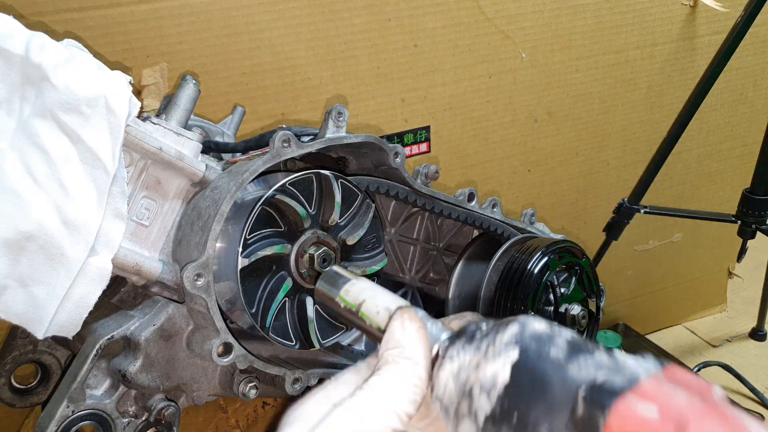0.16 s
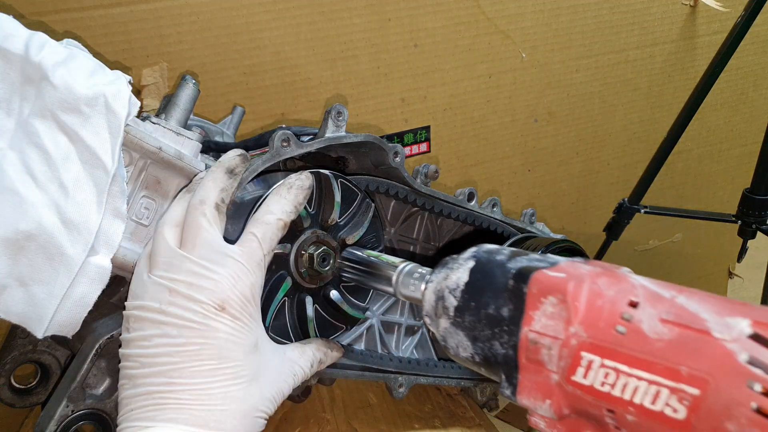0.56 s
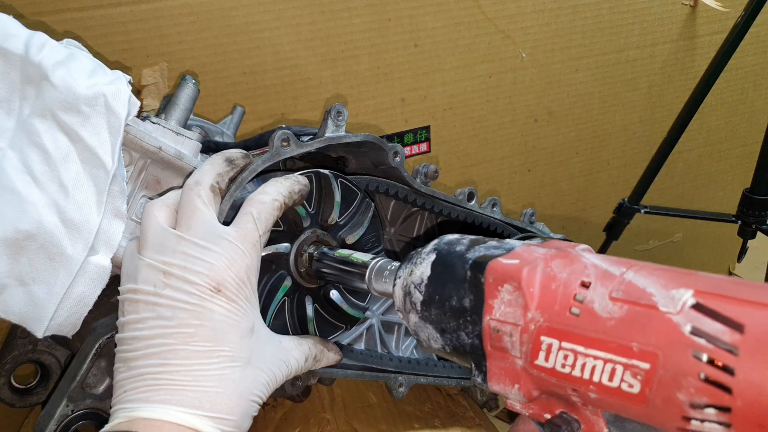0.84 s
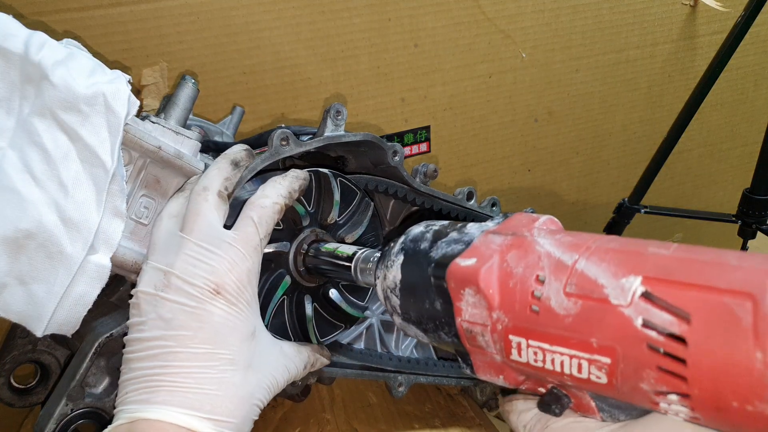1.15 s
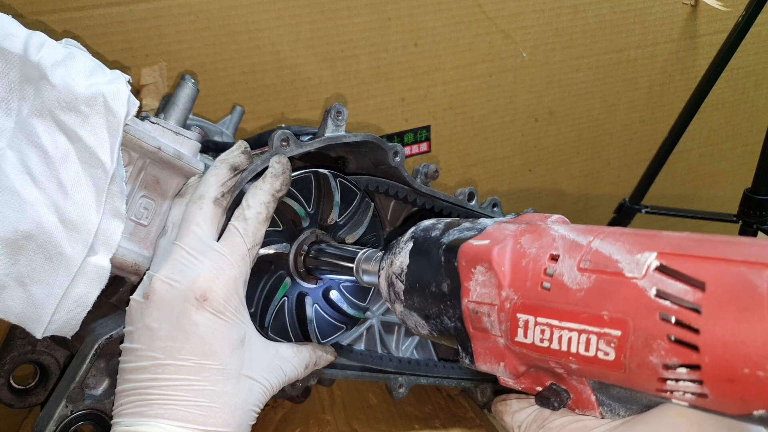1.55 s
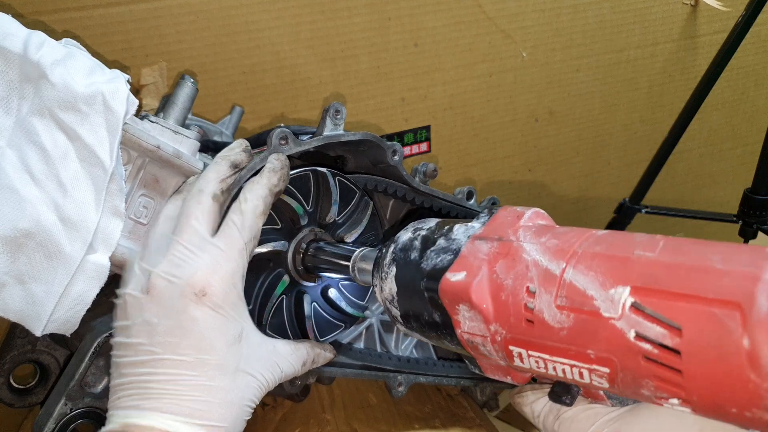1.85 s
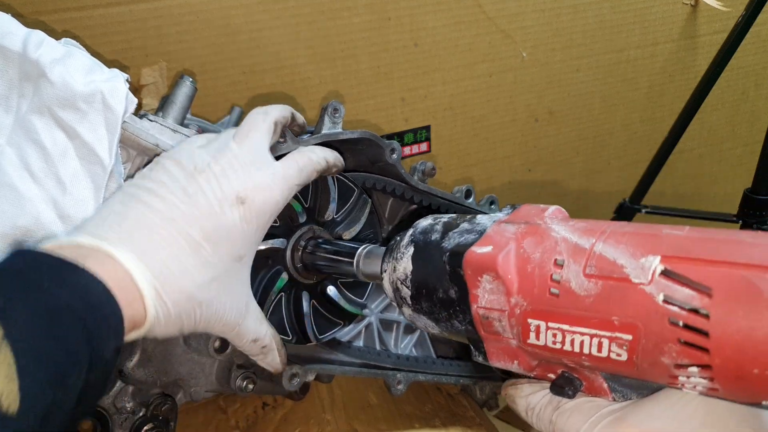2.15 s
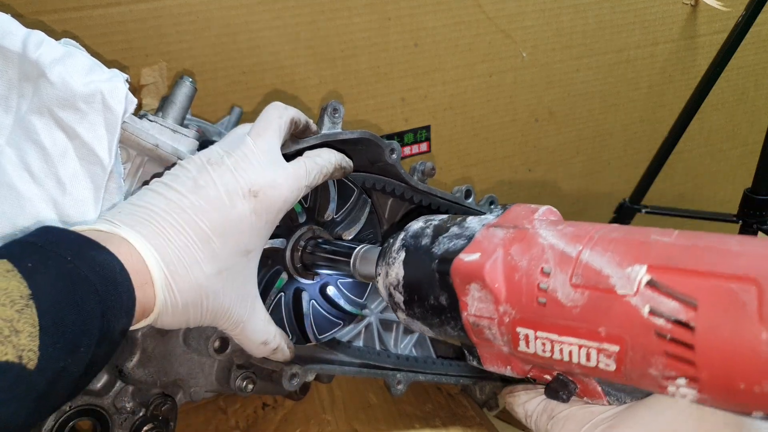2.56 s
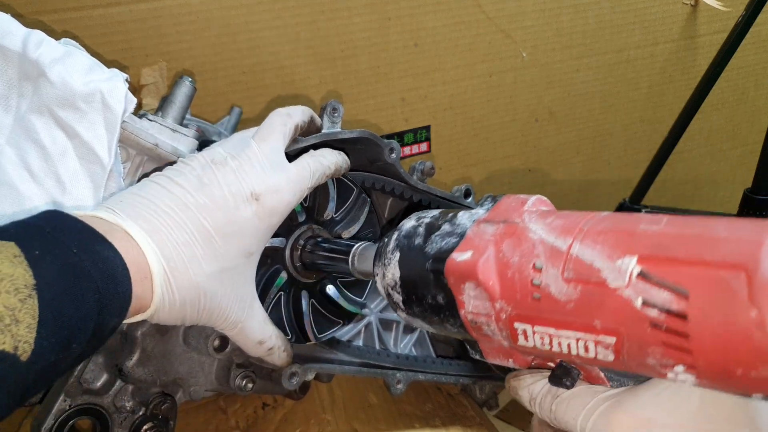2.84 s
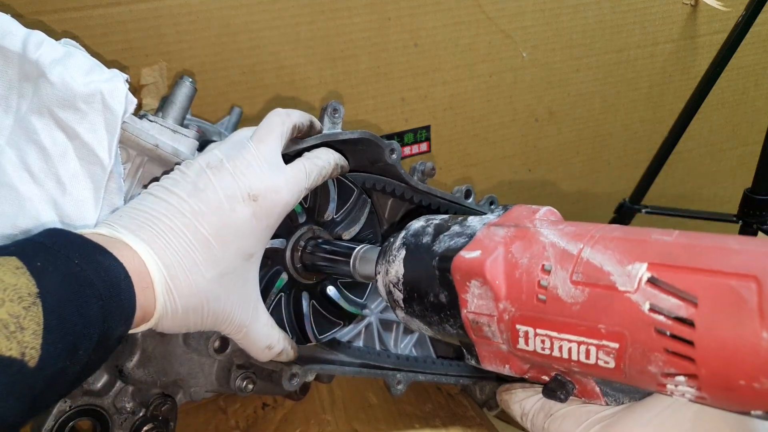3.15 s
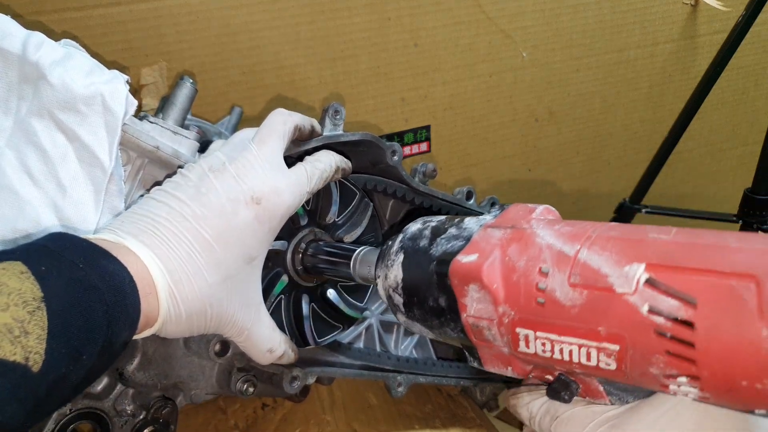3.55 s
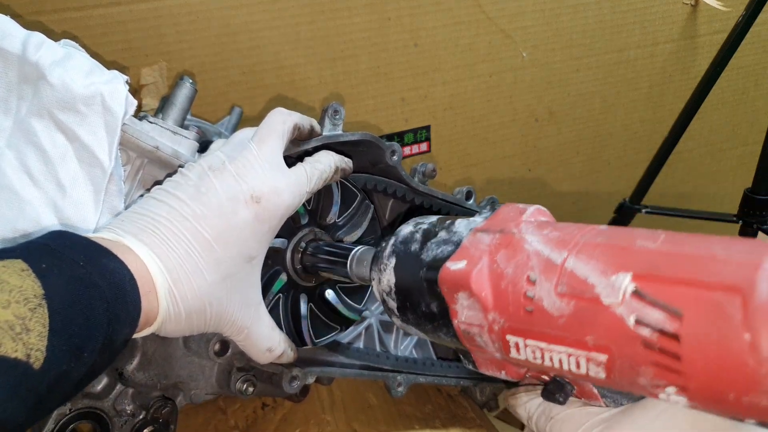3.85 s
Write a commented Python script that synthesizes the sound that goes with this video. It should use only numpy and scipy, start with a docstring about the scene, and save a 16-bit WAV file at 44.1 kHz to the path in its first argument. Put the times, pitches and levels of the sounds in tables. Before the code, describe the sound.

An electric impact wrench clicks onto a nut, whines faintly, then hammers in two loud grinding bursts.

```python
"""Impact wrench on a pulley nut

An electric impact wrench undoes the nut of a scooter's drive pulley, close by in a small workshop.
Steel knocks and ticks are short noise bursts through resonances. At a light trigger the speed control
whines in sine tones and the gears tick round. Then come two full bursts of grinding and hissing noise
in which the hammer strikes the anvil, and the pulley rings faintly on as fading sines."""
import sys
import numpy as np
from scipy import signal
from scipy.fft import rfft, irfft, next_fast_len
from scipy.io import wavfile
from scipy.ndimage import uniform_filter1d, map_coordinates

SR = 44100
rng = np.random.default_rng(int(sys.argv[2]) if len(sys.argv) > 2 else 0)


def digitize_waveform(pressure):
    """Quantize a signal to 16-bit integers and store it at the path in sys.argv[1].

    Rows of a 2-D input are taken as channels; values are limited to [-1, 1].
    """
    field = np.atleast_2d(pressure).T
    bounded = np.clip(field, -1, 1)
    quanta = np.round(bounded * 32767).astype(np.int16)
    wavfile.write(sys.argv[1], SR, quanta)


N = 176400  # samples: 4 s

# In all tables t60 is the time in which a sound sinks by 60 dB.
# Hammer blows: t/s, clang level/dB, crack level/dB
BLOWS = [(3.2039, -12.5, -35.5), (3.2143, -16, -23.5), (3.2205, -5, -23), (3.2328, -9, -23.5),
         (3.2443, -15.5, -16), (3.268, -9.5, -28.5), (3.2803, -13.5, -18), (3.3119, -10.5, -12),
         (3.3435, -14, -16.5), (3.359, -16.5, -21), (3.648, -15, -25.5), (3.661, -11.5, -16),
         (3.693, -11.5, -15), (3.705, -26.5, -19.5), (3.725, -11.5, -14), (3.7573, -9, -11.5),
         (3.7981, -9.5, -14.5), (3.831, -14, -17.5)]
# Colour of the hammer's crack and the air hiss: f/Hz, relative level/dB
CRACK_COLOUR = [(3000, -5), (4800, -2), (7500, -11.5), (11500, 0.5), (12400, 4.5), (13400, 0), (15600, -8)]
# Colour of light steel ticks and the slow gears: f/Hz, relative level/dB
TICK_COLOUR = [(130, -7), (400, -5.5), (700, -13), (1150, -0.5), (2500, -9.5), (4200, -18.5), (8000, -28)]
# Colour of the tool's clank and the glove's slide: f/Hz, relative level/dB
CLANK_COLOUR = [(250, -10.5), (420, 0), (700, -8.5), (1750, -2), (6500, -12), (14000, -19.5)]

TICK_T60 = 0.016  # s
BLOW_RISE_S = 0.0005
BUMP_T60 = 0.11  # s
FLUTTER_PER_S = 150  # random level points a second, in hiss and rattle


def amp(db):
    """Turn decibels into a gain."""
    return 10 ** (np.asarray(db) / 20)


def unit(x):
    """Scale to an average (RMS) strength of 1."""
    return x / np.sqrt(np.mean(x ** 2) + 1e-20)


def along(points, hz):
    """Read a (Hz, value) curve, with frequency spaced as the ear hears it (log axis)."""
    f, v = np.transpose(points)
    return np.interp(np.log(hz + 1), np.log(f + 1), v)


def level(rows):
    """Gain per sample from (s, .., dB) rows, silent outside them."""
    rows = np.array(rows)
    db = np.interp(np.arange(N) / SR, rows[:, 0], rows[:, -1], left=-150, right=-150)
    return amp(db)


def wobble(rate):
    """A smooth random curve through `rate` random points a second."""
    points = rng.standard_normal(int(N * rate / SR) + 4)
    return map_coordinates(points, [np.arange(N) * rate / SR])


def add(track, s, sound):
    """Mix a sound into a track at time s."""
    i = max(0, round(s * SR))
    track[i:i + len(sound)] += sound[:max(0, N - i)]


def spread(pair):
    """Blend two unrelated signals into left and right: alike in the bass, different in the treble."""
    # f/Hz, left-right likeness (1 = the same)
    alike = [(300, 0.92), (600, 0.45), (1300, 0.14), (4000, 0.07)]
    # f/Hz, left minus right/dB
    balance = [(50, 6.5), (130, 0.5), (500, 0), (2200, -5.5), (9000, -3.5)]
    m = next_fast_len(pair.shape[1] + 4096)
    hz = np.fft.rfftfreq(m, 1 / SR)
    turn = np.arccos(np.clip(along(alike, hz), -1, 1)) / 2
    mid, side = rfft(pair, m) * [np.cos(turn), np.sin(turn)]
    lean = along(balance, hz) / 2
    left_right = np.array([mid + side, mid - side]) * amp([lean, -lean])
    return irfft(left_right, m)[:, :pair.shape[1]]


def excite(envelope, colour):
    """Stereo noise under an envelope rings a body with this colour and many small resonances."""
    ripple_db, ripple_hz = 2, 50.07  # dense modes of the steel parts: depth, spacing
    m = 2 * next_fast_len(N // 2 + 8192)
    hz = np.fft.rfftfreq(m, 1 / SR)
    low_cut = np.hypot(1, (colour[0][0] / (hz + 1)) ** 2)
    high_cut = np.hypot(1, (hz / colour[-1][0]) ** 4)
    gain = amp(along(colour, hz)) / low_cut / high_cut
    ripple = map_coordinates(rng.standard_normal(SR), [hz / ripple_hz], mode="mirror")
    gain = gain * amp(ripple_db * ripple * hz / (hz + 500))  # weaker in the bass
    # Folding the cepstrum gives a filter that responds at once (minimum phase)
    cepstrum = irfft(np.log(np.maximum(unit(gain), 1e-6)))
    cepstrum[1:m // 2] *= 2
    cepstrum[m // 2 + 1:] = 0
    body = np.exp(rfft(cepstrum))
    noise = envelope * rng.standard_normal((2, N))
    return spread(irfft(rfft(noise, m) * body, m)[:, :N])


def bursts(rows, rise=0.000085):
    """Envelope of contacts given as (s, dB, t60 s): a quick rise (s), then a fading tail."""
    power, t = np.zeros(N), np.arange(SR // 5) / SR
    for s, db, t60 in rows:
        shape = amp(-60 * t / t60) * (1 - np.exp(-t / rise))
        add(power, s, (amp(db) * shape / shape.max()) ** 2)
    return np.sqrt(power)


def ring(hits, modes, rise):
    """Fading sines, one per mode (Hz, dB, t60 s), struck anew by each hit (s, dB)."""
    track, t = np.zeros(N), np.arange(SR * 3 // 4) / SR
    for s, db in hits:
        tones = 0
        for hz, mode_db, t60 in modes:
            fade = amp(mode_db + rng.standard_normal() - 60 * t / t60)  # each hit varies a little
            tones = tones + fade * np.sin(2 * np.pi * (hz * t + rng.random()))
        add(track, s, amp(db) * tones * (1 - np.exp(-t / rise)))
    return track


def room(x, wet_db):
    """Add the short echo tail of the workshop: fading noise that each sound sets off."""
    # f/Hz, t60/s
    decay = [(200, 0.25), (2000, 0.12), (14000, .15)]
    hz, t, z = signal.stft(rng.standard_normal((2, SR // 2)), SR, nperseg=256)
    fade = amp(-60 * t / along(decay, hz)[:, None])
    tail = signal.istft(z * fade, SR, nperseg=256)[1]
    tail = tail / np.linalg.norm(tail[0])
    tail = spread(np.pad(tail, ((0, 0), (SR // 300, 0))))  # the tail starts 1/300 s late
    mono = x.sum(0)[None] / np.sqrt(2)
    return x + amp(wet_db) * signal.fftconvolve(mono, tail, axes=1)[:, :N]


def band(hz):
    """Colour of one broad resonance."""
    width = 1.3  # ratio from the centre to the edge of the band
    return [(hz / width, -16), (hz, 0), (hz * width, -16)]


def workshop_air():
    """The quiet air of the workshop is steady noise, strongest in the bass."""
    # f/Hz, relative level/dB
    colour = [(80, 3), (400, -14), (5000, -30.5), (15000, -34.5)]
    return excite(amp(-68), colour)


def hands():
    """A glove slides and a palm lands softly, both as shaped noise, and something bumps faintly."""
    # Rubber glove slides on the tool: t/s, level/dB
    glove = [(0, -59.5), (.35, -63.5), (.48, -94.5)]
    # A hand lands, shifts and takes the knock on the case: t/s, level/dB
    palm = [(.25, -58), (.32, -31), (.42, -77), (.6, -78.5), (.75, -48.5), (.92, -63.5), (.97, -38.5),
            (1.15, -70)]
    # f/Hz, relative level/dB
    palm_colour = [(35, -1), (80, 0), (200, -17)]
    # A soft hollow bump: t/s, level/dB, t60/s
    nudge = [(.505, -63.5, BUMP_T60)]
    bump = excite(bursts(nudge, rise=0.026), band(600))
    return excite(level(palm), palm_colour) + excite(level(glove), CLANK_COLOUR) + bump


def play():
    """Envelope of faint ticks at chance moments while the tool is held on the nut."""
    first_s, last_s, per_s = 0.77, 2.85, 22
    middle_db, scatter_db = -55, 4
    times = np.arange(first_s, last_s, 1 / per_s)
    chance = rng.standard_normal((len(times), 2))
    rows = [(s + late / per_s, middle_db + scatter_db * size, TICK_T60)
            for s, (late, size) in zip(times, chance)]
    return bursts(rows)


def socket():
    """Steel knocks on steel as bursts of noise; the knocks also ring, rattle and thud in the case."""
    # Socket and tool knock on the nut:
    # t/s, clack level/dB, crack level/dB, thud level/dB, t60/s, ring f/Hz
    knocks = [(0.704, -25, -38, -34, 0.011, 1500), (0.7606, -32.5, -67, -38.5, 0.019, 1760),
              (0.9526, -9, -23, -25, 0.0083, 1600), (1.4606, -20, -14.5, -71, 0.017, 1930),
              (2.0221, -35.5, -66, -32.5, 0.012, 2550), (2.7757, -24.5, -41, -23.5, 0.0092, 2570)]
    # Light ticks of play in the socket and gears: t/s, level/dB
    light_ticks = [(0.791, -46), (0.8849, -44), (0.9025, -35), (0.9946, -35), (1.0212, -36), (1.151, -48),
                   (1.6078, -29.5), (1.6318, -29.5), (1.8109, -36.5), (1.823, -31), (1.864, -29.5),
                   (1.928, -39), (1.9509, -36), (2.262, -39.5), (2.2829, -33.5), (2.4974, -39),
                   (2.7006, -40), (2.7214, -30.5)]
    # Small bright clicks: t/s, level/dB
    clicks = [(2.139, -33.5), (2.1654, -41)]
    # The tool is swung up and clanks: t/s, level/dB, t60/s
    clanks = [(.001, -14, 0.063)]
    # Colours of the dull clack and the bright snap: f/Hz, relative level/dB
    clack_colour = [(160, -2.5), (900, 3.5), (1900, 1), (3000, -12), (7000, -32)]
    snap_colour = [(2500, -10), (4500, -6.5), (10000, 2), (15600, -7)]
    # Socket seated on the shaft: f/Hz, relative level/dB, t60/s
    shaft_modes = [(436, -14.5, 0.034), (1052, -8, .03), (1710, -28.5, 0.13)]
    # Engine case: f/Hz, relative level/dB, t60/s
    case_modes = [(124, -2, 0.23), (163, -3, 0.04), (235, -5.5, .14), (290, -8.5, 0.16)]
    ring_db, rattle_db, tick_snap_db = 3, -24.5, -18.5  # over the clack, clack and tick
    rattle_t60, rattle_rough_db = 0.17, 1.5  # s, dB

    hits = [(s, db) for s, db, *_ in knocks]
    clack = excite(bursts([(s, db, t60) for s, db, _, _, t60, _ in knocks]), clack_colour)
    clank = excite(bursts(clanks), CLANK_COLOUR)
    steel = sum(excite(bursts([(s, db + ring_db, t60)]), band(hz))
                for s, db, _, _, t60, hz in knocks)
    shaft = ring(hits, shaft_modes, rise=BLOW_RISE_S)
    # Loose parts shake after a knock
    rattle = bursts([(s, db + rattle_db, rattle_t60) for s, db in hits])
    rattle = rattle * amp(rattle_rough_db * wobble(FLUTTER_PER_S))
    tick_envelope = bursts([(s, db, TICK_T60) for s, db in light_ticks])
    ticks = excite(tick_envelope + rattle + play(), TICK_COLOUR)
    snaps = [(s, db, t60) for s, _, db, _, t60, _ in knocks]
    snaps += [(s, db + tick_snap_db, TICK_T60) for s, db in light_ticks]
    snaps += [(s, db, TICK_T60) for s, db in clicks]
    snap = excite(bursts(snaps), snap_colour)
    thud = ring([(s, db) for s, _, _, db, *_ in knocks], case_modes, rise=0.009)
    return room(clack + clank + steel + shaft + ticks + snap, wet_db=-6.5) + thud


def whine():
    """The speed control makes the windings sing: in steps at a light trigger, rising as it is pulled."""
    # Light trigger, steps of the whine: start t/s, end t/s, pitch f/Hz, first level/dB, last level/dB
    step_rows = [(1.17, 1.27, 3766, -71.5, -77.5), (1.368, 1.408, 3820, -58, -56.5),
                 (1.396, 1.456, 3995, -65, -52), (1.449, 1.576, 4710, -46.5, -42),
                 (1.581, 1.762, 4743, -40, -46), (1.764, 1.781, 4170, -53, -46.5),
                 (1.782, 1.804, 3790, -46, -56), (2.215, 2.447, 3799, -45.5, -44),
                 (2.439, 2.705, 4109, -57, -46.5)]
    # Trigger pulled through: t/s, pitch f/Hz, level/dB
    spin_up = [(3.093, 3190, -70.5), (3.12, 3420, -59), (3.135, 3500, -79), (3.155, 3750, -59),
               (3.17, 3800, -43)]
    # How the tool radiates the harmonics: f/Hz, level/dB
    colour = [(4800, -2), (7200, -25.5), (9500, -13.5), (15500, -22)]
    waver, drift = 0.0016, 0.002  # fast and slow pitch changes, as shares of the pitch
    flutter_db, pan_db = 0.2, -10  # pan: left minus right

    t, steps, glide = np.arange(N) / SR, np.array(step_rows), np.array(spin_up)
    step_now = np.clip(np.searchsorted(np.sort(steps[:, 0]), t) - 1, 0, None)
    pitch = np.where(t < glide[0, 0], steps[step_now, 2], np.interp(t, glide[:, 0], glide[:, 1]))
    step_gains = [level([(a, first), (b, last)]) for a, b, _, first, last in step_rows]
    gain = np.max(step_gains, axis=0) + level(spin_up)
    unsteady = 1 + waver * wobble(59) + drift * wobble(7)
    phase = 2 * np.pi * np.cumsum(uniform_filter1d(pitch, size=300) * unsteady) / SR
    tone = 0
    for k in range(1, 4):  # harmonics; the higher ones flutter more
        flutter = flutter_db * np.array([wobble(20) for side in "LR"])
        tone = tone + amp(along(colour, k * pitch) + k * flutter) * np.sin(k * phase)
    pan = amp([[pan_db / 2], [-pan_db / 2]])
    return np.sqrt(2) * uniform_filter1d(gain, size=130) * tone * pan


def motor():
    """Gear teeth tick faster as they get louder and merge into a grinding whir under a fluttering hiss."""
    # Gear train, at a light trigger and at full speed: t/s, level/dB
    gear_runs = [
        [(1.39, -68), (1.412, -43), (1.45, -39.5), (1.48, -30.5), (1.57, -30.5), (1.61, -43.5), (1.66, -68),
         (1.805, -69.5), (1.815, -46.5), (1.87, -39.5), (1.91, -52.5), (2.06, -72.5)],
        [(3.16, -74.5), (3.192, -24), (3.218, -15.5), (3.25, -23), (3.36, -24.5), (3.43, -42), (3.47, -57.5),
         (3.595, -72), (3.612, -48.5), (3.631, -25), (3.80, -22.5), (3.90, -48.5), (3.97, -75)],
    ]
    # Hiss of brushes and fan, one table for each run of the motor: t/s, level/dB
    air_runs = [
        [(1.38, -56), (1.455, -41), (1.472, -55), (1.52, -48), (1.66, -79), (1.87, -59.5), (2.28, -65.5),
         (2.42, -81)],
        [(3.15, -68), (3.22, -30), (3.33, -26), (3.43, -52), (3.52, -91)],
        [(3.60, -79), (3.64, -32), (3.79, -29), (3.86, -37), (3.98, -85.5)],
    ]
    # Gears at full speed: f/Hz, relative level/dB
    gear_colour = [(110, -12.5), (250, -3), (420, -1.5), (750, -14), (1150, 0.5), (1600, -4.5),
                   (2450, -1.5), (4300, -14), (8000, -27)]
    ticks_per_s, ref_db, doubling_db = 150, -32.5, 20.5  # rate at ref_db, dB for twice the rate
    tooth_t60, scatter_db, grind_db = 0.014, 5, -3.5  # s, dB, dB
    # Before a blow the hammer spring loads the motor: time, share of the sound lost
    wind_up_s, wind_up_dip = 0.012, 0.39

    slow, fast = (level(run) for run in gear_runs)
    rate = ticks_per_s * 2 ** ((20 * np.log10(slow + fast) - ref_db) / doubling_db)
    times = np.flatnonzero(np.diff(np.floor(np.cumsum(rate) / SR))) / SR
    scatter = scatter_db * (2 * rng.random(N) - 1)
    teeth = 1.42 * bursts([(s, db, tooth_t60) for s, db in zip(times, scatter)])
    grind = np.hypot(teeth, amp(grind_db))  # a steady grind fills the gaps between teeth
    t = np.arange(N) / SR
    ramps = [np.interp(t, [s - wind_up_s, s], [0, 1], right=0) for s, *_ in BLOWS]
    ease = 1 - wind_up_dip * np.max(ramps, axis=0)
    flutter = amp(4 * wobble(FLUTTER_PER_S))
    hiss = sum(level(run) for run in air_runs) * np.sqrt(grind) * flutter
    slow_gears = excite(slow * grind, TICK_COLOUR)
    fast_gears = excite(fast * grind * ease, gear_colour)
    return room(slow_gears + fast_gears + excite(hiss * ease, CRACK_COLOUR), wet_db=-15.5)


def hammer():
    """Each blow clangs in the tool and cracks in the socket as noise, and rings the pulley as sines."""
    # f/Hz, relative level/dB
    clang_colour = [(70, -7), (187, -18), (420, -3.5), (795, -27.5), (1270, -2), (1530, -7.5), (2500, -1),
                    (3700, -9), (4400, -20), (8000, -34), (17600, -110)]
    # f/Hz, relative level/dB, t60/s
    pulley_modes = [(282.9, 8.5, 0.81), (931, -8, 1), (1540, -4.5, 0.85)]
    pulley_db = -50.5  # against the clang
    clang = excite(bursts([(s, db, 0.014) for s, db, _ in BLOWS], BLOW_RISE_S), clang_colour)
    crack = excite(bursts([(s, db, 0.017) for s, _, db in BLOWS], BLOW_RISE_S), CRACK_COLOUR)
    pulley = ring([(s, db + pulley_db) for s, db, _ in BLOWS], pulley_modes, rise=0.001)
    return room(clang + crack, wet_db=-11.5) + pulley


def scene():
    """All sources over the quiet air of the workshop."""
    return workshop_air() + hands() + socket() + whine() + motor() + hammer()


def record(dry):
    """Peaks round off at full scale; a steep filter removes what lies above the band limit."""
    top_hz = 16000
    x = dry / (1 + np.abs(dry) ** 6) ** (1 / 6)
    m = next_fast_len(N + 8192)
    cut = np.hypot(1, (np.fft.rfftfreq(m, 1 / SR) / top_hz) ** 90)
    return irfft(rfft(x, m) / cut, m)[:, :N]


dry = scene()
out = record(dry)
digitize_waveform(out)
```